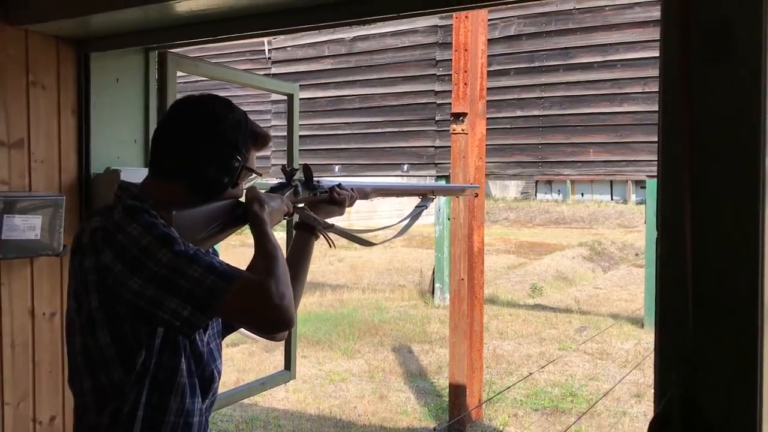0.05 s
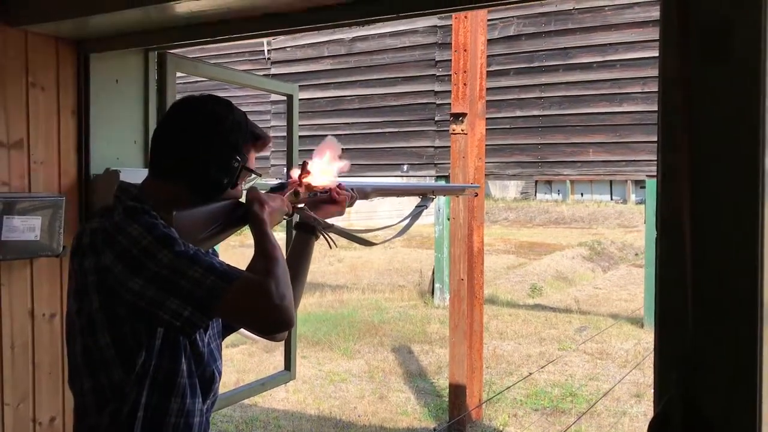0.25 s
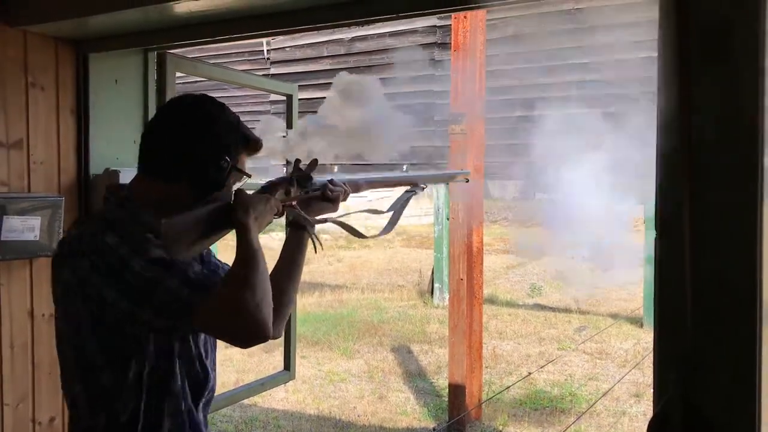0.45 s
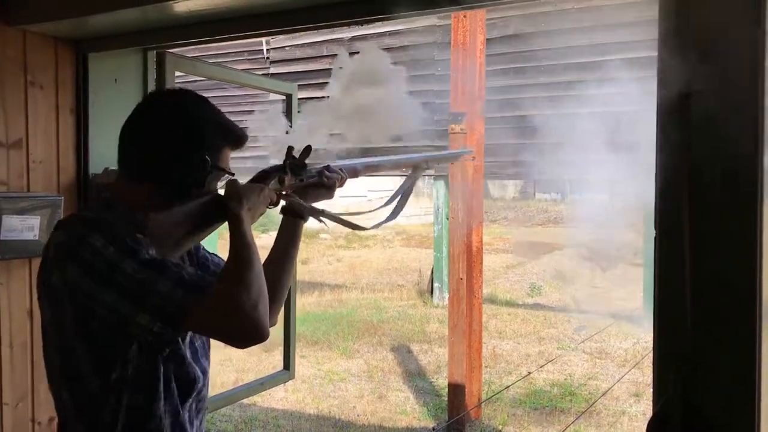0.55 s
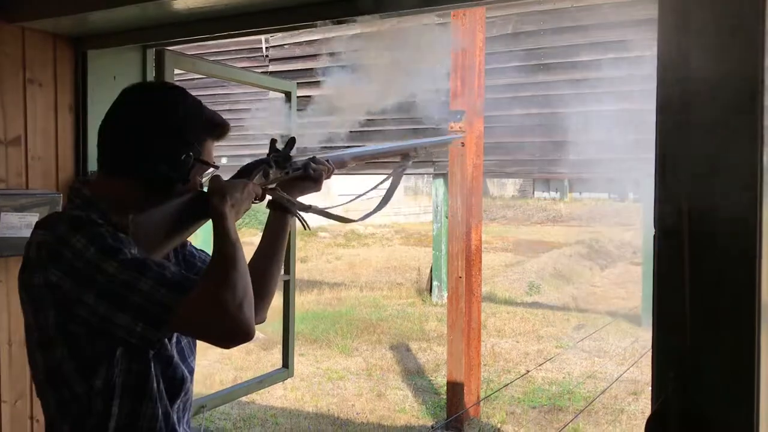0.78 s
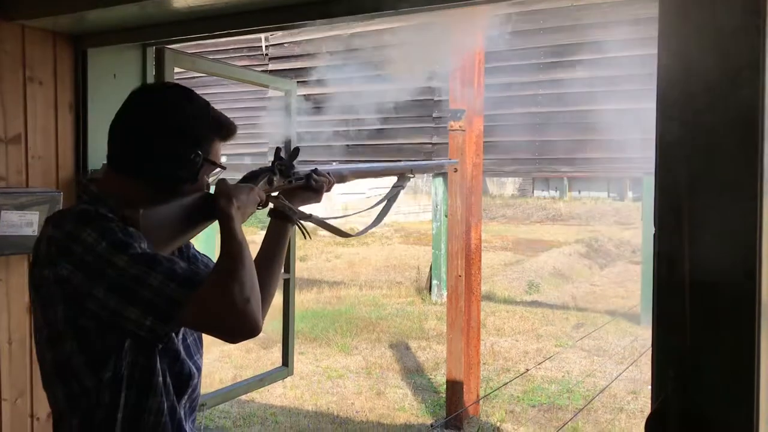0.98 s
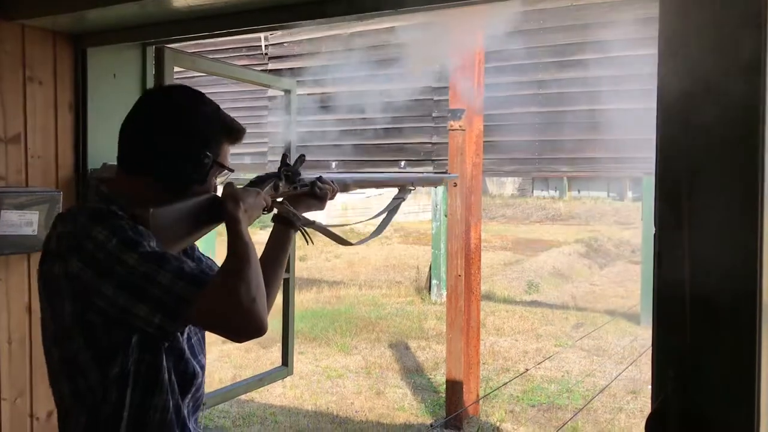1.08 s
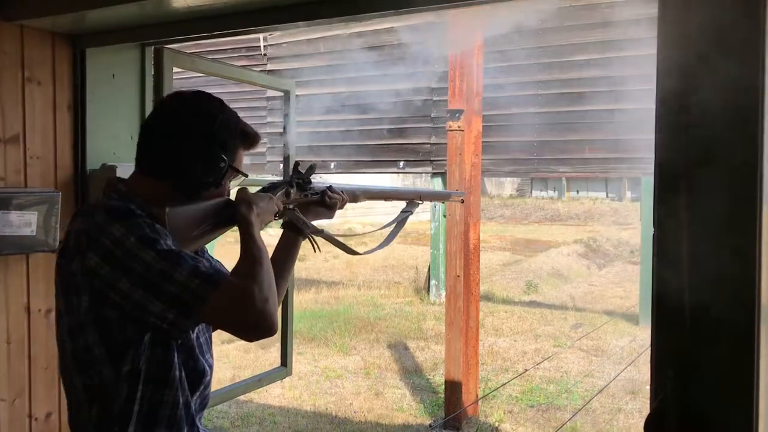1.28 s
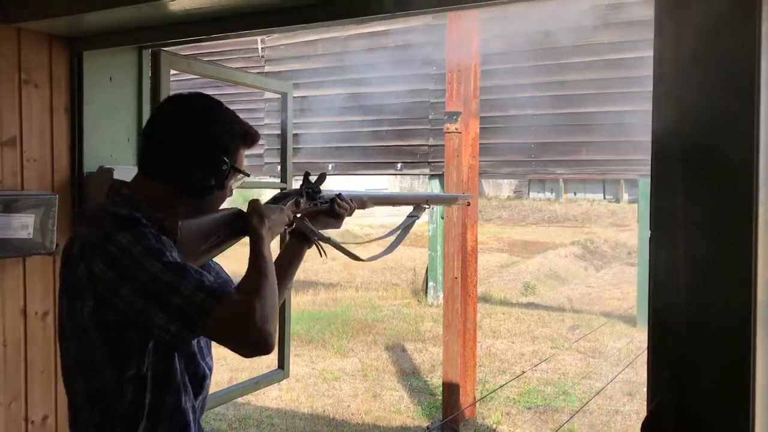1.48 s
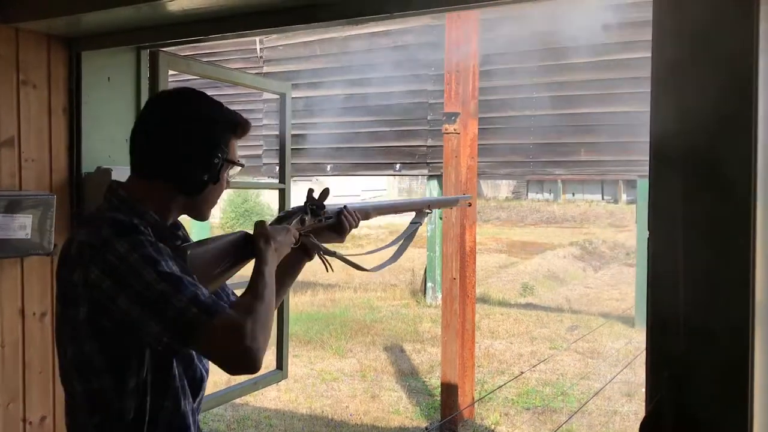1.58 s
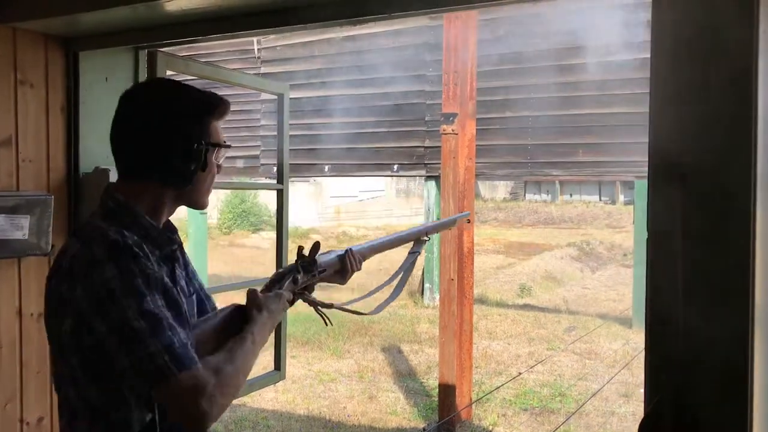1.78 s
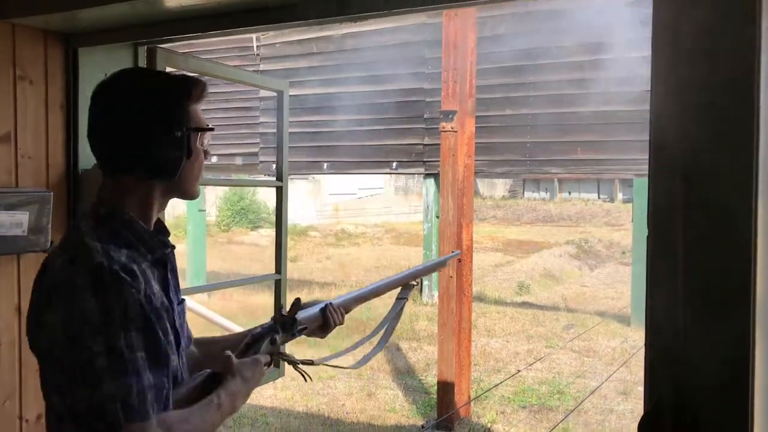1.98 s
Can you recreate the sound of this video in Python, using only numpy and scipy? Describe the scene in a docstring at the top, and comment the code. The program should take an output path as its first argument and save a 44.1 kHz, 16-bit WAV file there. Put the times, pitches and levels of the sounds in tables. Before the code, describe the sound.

A single musket shot booms close up from a wooden shelter at an outdoor range. A metallic clack and short hiss lead into the blast, followed by a sharp downrange crack and echoes dying into a low rumble.

```python
"""A flintlock musket on an outdoor range

Steel parts clatter in the lock, the priming fizzes, and a quarter second later the charge roars and
excites the resonances of a wooden shelter. A metal fitting rings on, sharp cracks come from downrange
and echoes roll back over a low rumble. A limiter ducks at the blast and slowly recovers."""
import sys
import numpy as np
from scipy import signal
from scipy.fft import rfft, irfft
from scipy.io import wavfile
from scipy.ndimage import uniform_filter1d

SR = 44100
rng = np.random.default_rng(int(sys.argv[2]) if len(sys.argv) > 2 else 0)


def master(y):
    """Save y as 16-bit WAV."""
    cut = np.clip(np.atleast_2d(y).T, -1, 1)
    pcm = np.round(cut * 32767)  # scale
    wavfile.write(sys.argv[1], SR, pcm.astype(np.int16))


N = 90404
TIME = np.arange(N) / SR
HZ = np.fft.rfftfreq(N, 1 / SR)
FIRE_S, PEAK_S = .474, .5575  # onset and peak of the roar
EDGE_HZ = 15950


def amp(db):
    """Amplitude ratio of a level in decibels."""
    return 10 ** (np.asarray(db) / 20)


def unit(x):
    """Normalisation to rms 1."""
    return x / np.sqrt(np.mean(x ** 2) + 1e-20)


def curve_at(points, hz):
    """Interpolation on a log-frequency axis."""
    f, value = np.transpose(points)
    return np.interp(np.log(hz + 1), np.log(f + 1), value)


def noise(spectrum):
    """Spectral shaping of white noise, at rms 1."""
    return unit(irfft(rfft(rng.standard_normal(N)) * amp(curve_at(spectrum, HZ)), N))


def burst(start, rise, t60):
    """Linear attack, then exponential decay by 60 dB in t60 seconds."""
    age = TIME - start
    return np.clip(age / rise, 0, 1) * np.exp(-np.log(1000) * np.maximum(age - rise, 0) / t60)


def swells(rows):
    """Joint envelope of incoherent bursts: their powers add."""
    return np.sqrt(sum((amp(db) * burst(start, rise, t60)) ** 2 for start, db, rise, t60 in rows))


def impacts(rows, spectrum, rise_s=.0003):
    """Impulsive excitation: noise bursts with a steep attack."""
    return noise(spectrum) * swells((start, db, rise_s, t60) for start, db, t60 in rows)


# analysis bands (centre frequency [Hz])
BAND_CENTRES = [40, 85, 175, 350, 700, 1400, 2800, 5600, 9800, 14000]
def bands():
    """A filter bank splits white noise into overlapping bands."""
    white = rfft(rng.standard_normal(N)) * (HZ > BAND_CENTRES[0] * .5) * (HZ < EDGE_HZ)
    shares = [np.interp(np.log(HZ + 1), np.log(BAND_CENTRES), row) for row in np.eye(len(BAND_CENTRES))]
    return [irfft(white * np.sin(np.pi / 2 * share) ** 2, N) for share in shares]


# the roar as heard, a row per band (peak level [dB], growth rate [dB/s], T60 [s])
ROAR_BANDS = [(-8.5, 600, .4), (-0.5, 599, .3), (3, 479.5, .3), (4, 439.5, .32), (5, 341, 0.25),
              (4, 290.5, .285), (2, 269, 0.22), (2.5, 225, 0.2), (-1, 204, .21), (-3.5, 174, .19)]
def roar(onset_s=.0099, crest_s=.013):
    """Exponential envelopes: the roar as heard swells quickly from bright hiss to deep boom, then dies."""
    age = TIME - PEAK_S
    after = crest_s * np.logaddexp(0, age / crest_s)  # a soft knee rounds the crest
    before = after - age
    knee = crest_s * np.log(2)
    out = np.zeros(N)
    for (db, growth, t60), band in zip(ROAR_BANDS, bands()):
        swell = amp(db - growth * (before - knee))
        decay = np.exp(-np.log(1000) * (after - knee) / t60)
        out += unit(band) * swell * decay
    return out * np.clip((TIME - FIRE_S) / onset_s, 0, 1)


# shelter resonances (frequency [Hz], level [dB], peak time [s], rise [s], T60 [s])
SHELTER_MODES = [(41, 4, .575, .02, 0.46), (112, 13.5, .541, .011, .2), (158, 10, .56, 0.012, 0.2),
                 (187, 14.5, .555, 0.01, .15), (210, 2, .63, 0.02, 0.14), (338, 3.5, .62, .025, 0.19),
                 (368, 1.5, .59, 0.025, 0.37), (383.7, 5.5, .565, .02, 0.28), (520, -1.5, .55, 0.0249, .35),
                 (754, -4.5, .55, .025, .35)]
def shelter_boom():
    """Resonance: the blast builds up the shelter's low modes, which then decay freely."""
    out = np.zeros(N)
    for hz, db, peak, rise, t60 in SHELTER_MODES:
        age = TIME - peak
        swell = np.exp(-.5 * (np.minimum(age, 0) / rise) ** 2)
        decay = np.exp(-np.log(1000) * np.maximum(age, 0) / t60)
        out += amp(db) * swell * decay * np.sin(2 * np.pi * hz * age)
    return out


# muzzle bark (frequency [Hz], relative density [dB])
BARK_SPECTRUM = [(300, -21), (900, -3.5), (1400, 1), (2100, -0.5), (3000, -15.5), (8000, -34.5)]
def muzzle_bark():
    """A midrange transient as the charge leaves the muzzle, just ahead of the boom."""
    return amp(-4.5) * burst(start=.497, rise=.005, t60=.1) * noise(BARK_SPECTRUM)


# trigger, sear, flint on steel, pan cover, cock on its stop (time [s], level [dB], T60 [s])
LOCK_IMPACTS = [(0.1897, -48, .05), (.1953, -41, 0.066), (0.2051, -17, .032), (0.2131, -9.5, .065),
                (.2238, -7, 0.04), (.241, -11.5, 0.066)]
# clatter (frequency [Hz], relative density [dB])
LOCK_SPECTRUM = [(150, -46), (420, -24), (550, -1), (800, -1), (1150, -6), (1500, 4.5), (1900, -2.5),
                 (2400, 2), (2900, -4.5), (4000, -0.5), (6800, -6), (8200, -1.5), (9200, -1.5),
                 (10000, -11), (12500, -4), (16000, -7.5)]
# ringing steel (frequency [Hz], relative level [dB], T60 [s])
STEEL_MODES = [(804, -31, .25), (947, -28.5, .25), (1408, -30, 0.26), (1658, -29.5, 0.3), (2218, -29, .3),
               (2320, -26.5, .25), (2580, -24.5, .16), (2637, -26.5, .2), (3980, -24.5, .19),
               (5841, -30.5, .15), (8274, -23, 0.09), (9071, -26, .14)]
def lock(ring_db=-2, room_db=-9, ring_rise_s=.001):
    """Impact excitation: steel parts strike in quick succession and ring in their normal modes."""
    clatter = impacts(LOCK_IMPACTS, LOCK_SPECTRUM)
    hardest_db = max(db for _, db, _ in LOCK_IMPACTS)
    ring = np.zeros(N)
    for hz, mode_db, t60 in STEEL_MODES:
        envelope = swells((start, db - hardest_db, ring_rise_s, t60) for start, db, _ in LOCK_IMPACTS)
        ring += amp(mode_db) * envelope * np.sin(2 * np.pi * (hz * TIME + rng.random()))
    return clatter + amp(ring_db) * ring + amp(room_db) * shelter_reverb(clatter)


# pan flash, touch hole, first jet (time [s], level [dB], rise [s], T60 [s])
POWDER_SPURTS = [(.25, -43, .1, .7), (.461, -24.5, .002, .25), (.4725, -18.5, .003, .1),
                 (.4765, -3.5, 0.0048, .08)]
# the spurts and a low puff (frequency [Hz], relative density [dB])
SPURT_SPECTRUM = [(40, -16), (120, -3), (200, 4.5), (700, 0.5), (1500, 4), (3000, -1), (4500, 2.5),
                  (7000, 0.5), (10000, -2.5), (13000, 1.5), (16000, 0.5)]
PUFF_SPECTRUM = [(80, -16), (230, 3.5), (360, -4), (600, -6.5), (1500, -25.5), (6000, -60)]
def priming():
    """Combustion and jet noise: powder flashes in the pan, then gas jets out ever harder."""
    fizz = swells(POWDER_SPURTS) * noise(SPURT_SPECTRUM)
    puff = amp(-40) * burst(start=.345, rise=.025, t60=.26) * noise(PUFF_SPECTRUM)
    return fizz + puff


# reports from downrange (time [s], level [dB], T60 [s])
CRACK_ARRIVALS = [(.7836, -11.5, .01), (.8478, 5, .01), (.852, -6, .055), (.865, -6, .02)]
# their timbre (frequency [Hz], relative density [dB])
CRACK_SPECTRUM = [(200, -23), (900, 0), (3000, 1.5), (6000, -2), (9000, -10), (15000, -20.5)]
def cracks(room_db=-5.5):
    """Propagation delay: sharp reports, probably the ball striking, arrive after the shot."""
    direct = impacts(CRACK_ARRIVALS, CRACK_SPECTRUM)
    return direct + amp(room_db) * shelter_reverb(direct)


# reverberation time of the shelter (frequency [Hz], T60 [s])
SHELTER_T60 = [(200, .4), (900, 0.43), (2300, 0.58), (5000, .42), (9000, 0.41), (15000, .27)]
def shelter_reverb(x, rise_s=.008):
    """Diffuse reflection under the roof: convolution with a decaying noise response."""
    tail = sum(band * burst(0, rise_s, curve_at(SHELTER_T60, hz))
               for hz, band in zip(BAND_CENTRES, bands()))
    return signal.fftconvolve(x, tail / np.linalg.norm(tail))[:N]


# reverberation of the range, a row per band (level [dB], T60 [s])
ROLL_BANDS = [(-30.5, 2), (-18.5, 2.12), (-26.5, 2.12), (-27, 2.6), (-18, 2.31), (-14.5, 2.265),
              (-18, 1.946), (-21, 1.404), (-30, 1.04), (-42, .8)]
# echoes from the banks and late low rumbles (time [s], level [dB], rise [s], T60 [s])
BANK_ECHOES = [(.708, -9, .012, 0.43), (.776, -6.5, 0.0072, 0.83), (.825, -7.5, 0.024, 0.28),
               (.885, -14, 0.0094, 0.23), (1.06, -28, .025, .7)]
LATE_RUMBLES = [(1.42, -33.5, 0.16, 3.9), (1.76, -33, 0.051, 0.34)]
# banks, far end and rumbles (frequency [Hz], relative density [dB])
BANK_SPECTRUM = [(30, -17), (90, 4), (170, -13.5), (330, -7), (600, -8.5), (760, -0.5), (1050, 2.5),
                 (1350, -4), (1600, -1), (2000, -16), (3500, -11), (7000, -27), (10000, -34), (15000, -50)]
FAR_SPECTRUM = [(200, -23), (550, -17.5), (800, -0.5), (1100, 2.5), (1750, -4), (2150, -16), (4000, -21.5),
                (6000, -37), (8000, -58)]
RUMBLE_SPECTRUM = [(20, -30), (36, -3), (60, -1.5), (95, 2), (140, 4), (180, -25), (300, -17), (800, -48),
                   (3000, -77.5)]
def range_echoes(flutter_db=1.14, flutter_s=.006):
    """Echo delay grows with path length: near banks answer first, then the far end, then low rumbles."""
    flutter = unit(uniform_filter1d(rng.standard_normal(N), round(flutter_s * SR)))
    roll = sum(amp(db) * unit(band) * burst(FIRE_S, PEAK_S - FIRE_S, t60)
               for (db, t60), band in zip(ROLL_BANDS, bands()))
    near = noise(BANK_SPECTRUM) * swells(BANK_ECHOES)
    far = noise(FAR_SPECTRUM) * amp(-31.5) * burst(start=1.194, rise=.27, t60=1.44)
    rumble = noise(RUMBLE_SPECTRUM) * swells(LATE_RUMBLES)
    return (roll + near + far) * amp(flutter_db * flutter) + rumble


# metal fitting (frequency [Hz], level [dB], T60 [s])
FITTING_MODES = [(231.5, -46.5, 30), (274.5, -31, 9)]
def fitting_ring():
    """Lightly damped vibration: a metal fitting shaken by the blast rings on."""
    return sum(amp(db) * burst(FIRE_S, PEAK_S - FIRE_S, t60) * np.sin(2 * np.pi * hz * TIME)
               for hz, db, t60 in FITTING_MODES)


# sleeve and sling (time [s], level [dB], rise [s], T60 [s])
RUSTLES = [(1.378, -56, .003, .12), (1.66, -66, 0.029, .3), (1.78, -65, .05, 1.3)]
# their timbre (frequency [Hz], relative density [dB])
RUSTLE_SPECTRUM = [(500, -10), (3000, -2), (16000, -2)]
def rustle():
    """Friction noise: sleeve and sling rustle faintly as the musket comes down."""
    return swells(RUSTLES) * noise(RUSTLE_SPECTRUM)


# outdoor background (frequency [Hz], relative density [dB])
AMBIENT_SPECTRUM = [(15, -41), (25, -20.5), (35, -11), (60, -2.5), (95, -0.5), (150, -17.5), (300, -26.5),
                    (700, -41.5), (1500, -50.5), (3000, -58.5), (7000, -62), (15000, -64.5)]
def ambience():
    """Stationary noise: a low outdoor rumble."""
    return amp(-38.5) * noise(AMBIENT_SPECTRUM)


def scene():
    """Superposition of the shot, its surroundings and its echoes in one channel."""
    shot = muzzle_bark() + lock() + priming() + roar() + shelter_boom() + fitting_ring()
    return (shot + ambience() + rustle() + range_echoes() + cracks())[None]


def record(dry, threshold_db=-8, recovery_db_per_s=13, window_s=.0097):
    """Limiting: the gain ducks at once and recovers slowly; soft clipping and a low-pass follow."""
    power = uniform_filter1d(dry[0] ** 2, round(window_s * SR))
    over_db = np.maximum(10 * np.log10(abs(power) + 1e-12) - threshold_db, 0)
    recovery = recovery_db_per_s * TIME
    duck_db = np.maximum.accumulate(over_db + recovery) - recovery
    limited = dry * amp(-uniform_filter1d(duck_db, size=64))
    rounded = limited / (1 + limited ** 6) ** (1 / 6)
    lowpass = signal.firwin(511, EDGE_HZ, window=("kaiser", 9), fs=SR)
    return signal.oaconvolve(rounded, lowpass[None], "same")


dry = scene()
out = record(dry)
master(out)
```